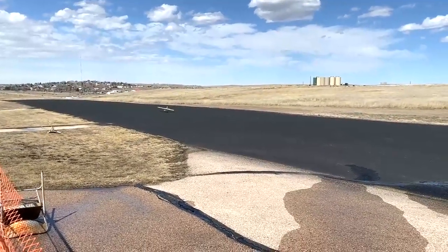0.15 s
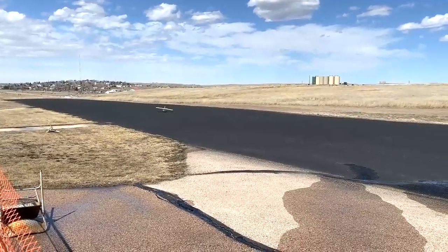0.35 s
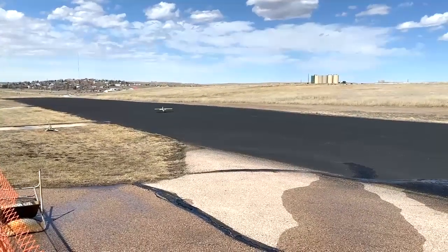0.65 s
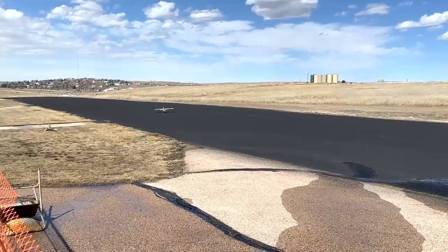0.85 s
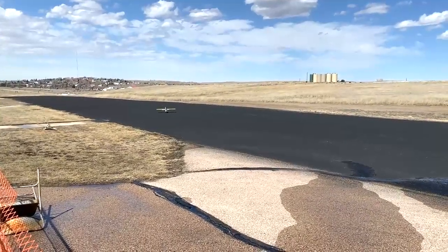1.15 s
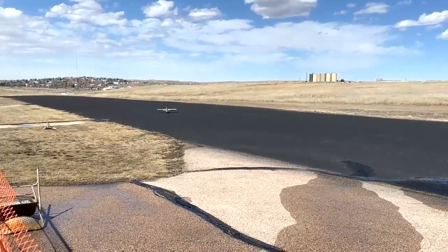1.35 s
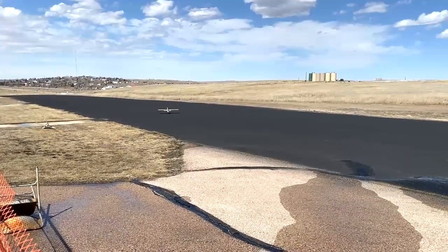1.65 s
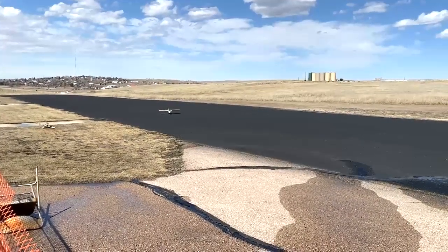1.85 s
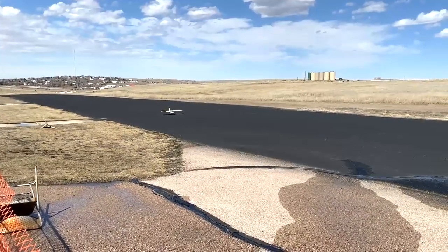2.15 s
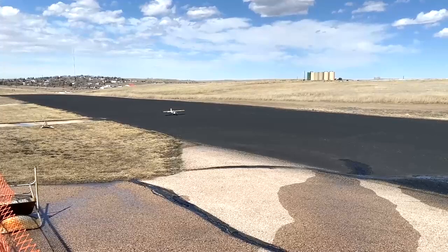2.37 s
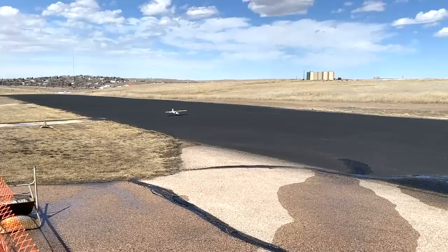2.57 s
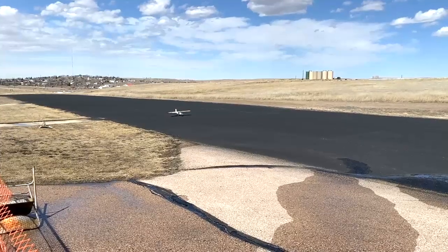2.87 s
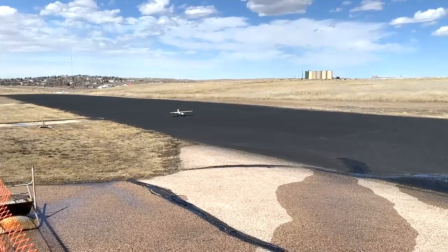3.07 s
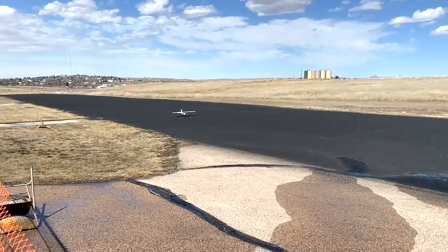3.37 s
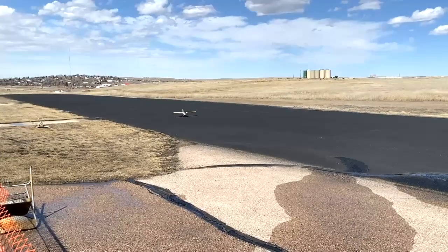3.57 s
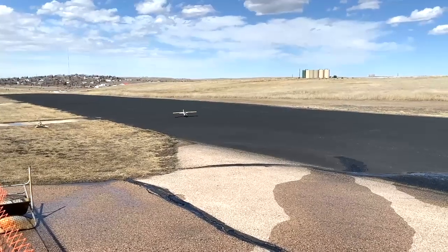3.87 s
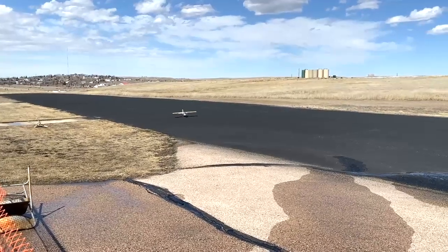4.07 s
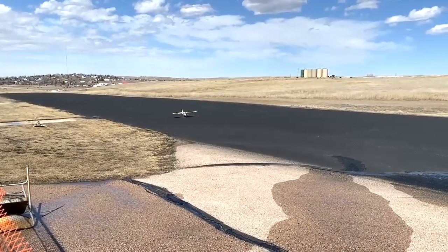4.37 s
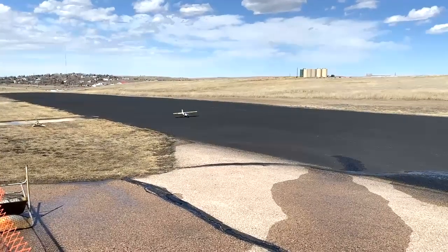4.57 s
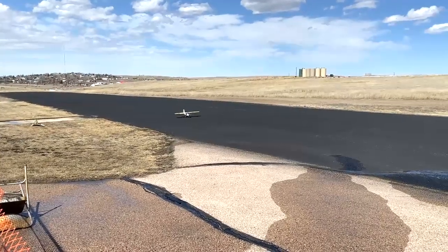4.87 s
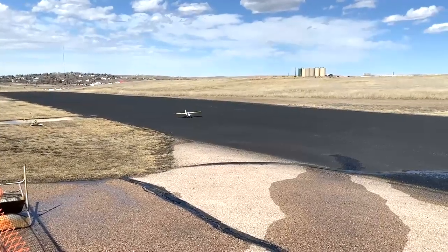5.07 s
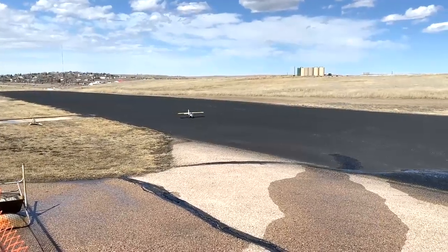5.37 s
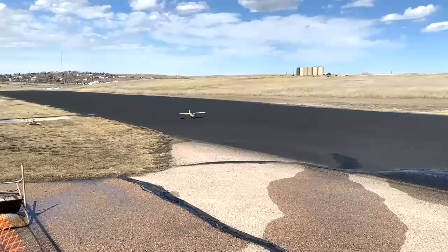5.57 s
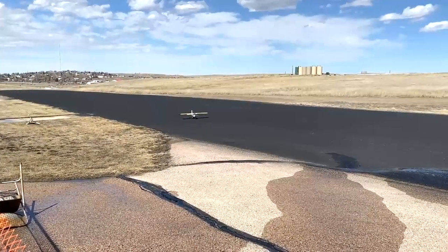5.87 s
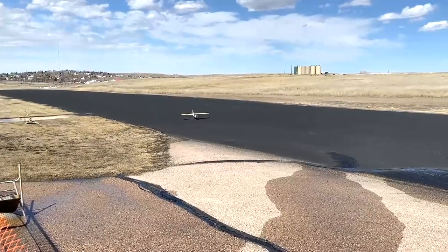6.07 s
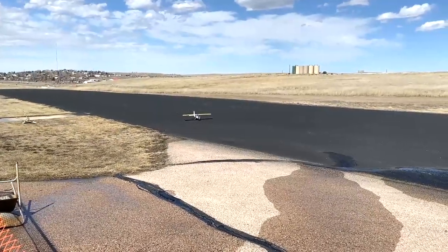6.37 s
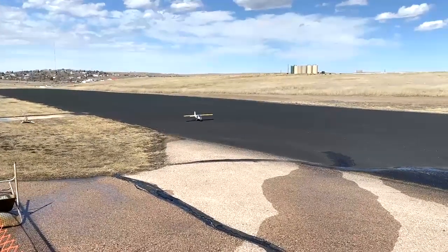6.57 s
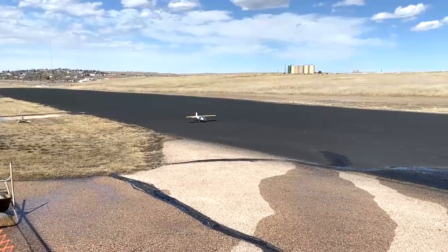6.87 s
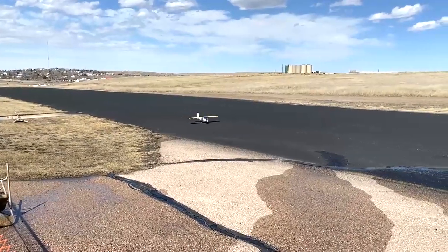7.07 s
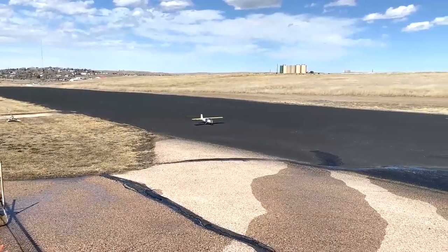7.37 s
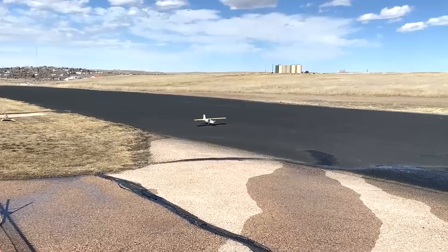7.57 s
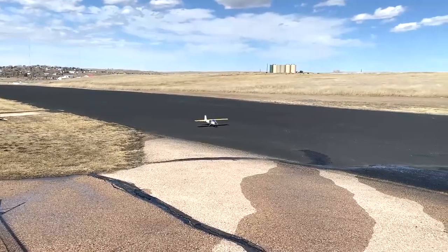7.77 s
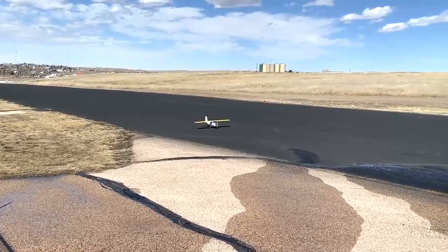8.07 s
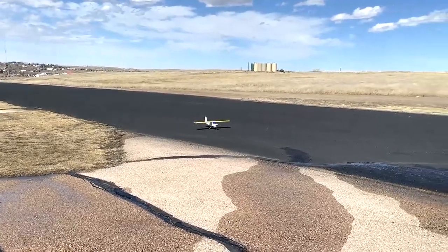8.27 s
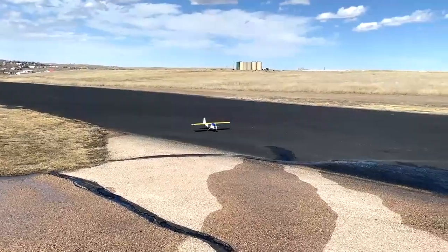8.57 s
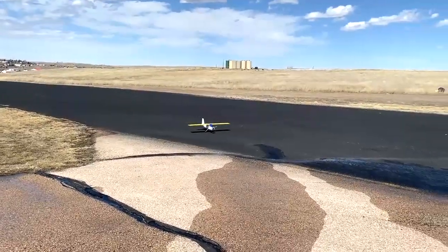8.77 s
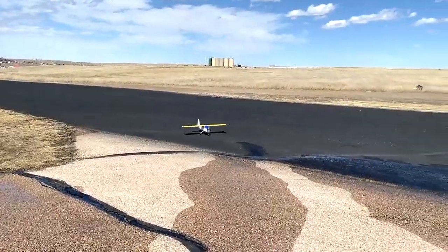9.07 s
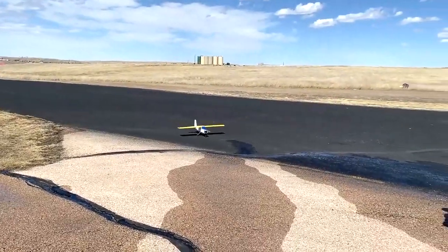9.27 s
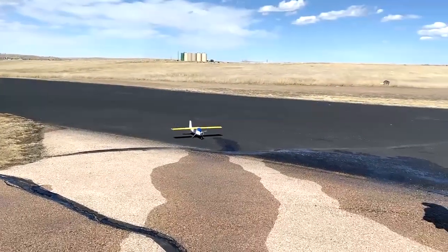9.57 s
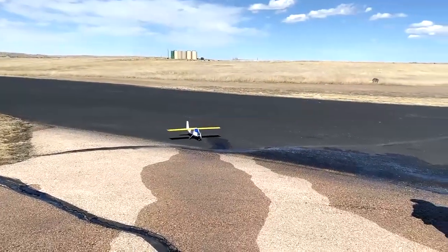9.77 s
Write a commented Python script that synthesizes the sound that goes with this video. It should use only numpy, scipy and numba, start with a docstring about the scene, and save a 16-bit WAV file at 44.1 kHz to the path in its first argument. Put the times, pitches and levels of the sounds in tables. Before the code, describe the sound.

A handheld stereo phone catches soft, bassy wind buffets, strongest a little past six seconds, over a distant model plane rolling on rough asphalt. Hollow wheel roar, light axle rattle, airy hiss and sparse grit clicks continue throughout. A faint electric whine dips, then sweeps up near four seconds and stays high beside a piercing, thin whistle. The plane comes nearer and louder; near the end the motor stops and the wheels roll on.

```python
"""Gusts thump and flutter on a phone while a small electric model plane taxis up an asphalt strip.
The wind is low noise plus eddies, short sines that slide down in pitch. Foam wheels roar as noise through
the resonances of a hollow airframe, with axle rattle, hiss and ticks of grit. The speed controller whistles
near 8 kHz and the motor whines up as the throttle opens: sines tied to the shaft speed. Two microphone
ports hear the strip with levels and phases that shift as the plane comes abeam."""
import sys
import numpy as np
from scipy import signal
from scipy.fft import rfft, irfft, next_fast_len
from scipy.io import wavfile
from scipy.ndimage import uniform_filter1d
from numba import njit

SR = 44100
rng = np.random.default_rng(int(sys.argv[2]) if len(sys.argv) > 2 else 0)


def master_out(mix):
    """Clip the mix to full scale and print it as 16-bit PCM to the path in sys.argv[1]."""
    frames = np.transpose(np.atleast_2d(mix))
    ceiling = np.clip(frames, -1, 1)
    pcm = np.round(ceiling * 32767).astype(np.int16)
    wavfile.write(sys.argv[1], SR, pcm)


N = 437913
T = np.arange(N) / SR
HZ = np.fft.rfftfreq(next_fast_len(N), 1 / SR)

# Wind between the puffs. Each row: time in seconds, rumble in dB, flutter in dB.
WIND_LULL = [(0, -31, -53), (0.15, -59, -59), (1.3, -61.5, -60), (1.77, -48.5, -51), (2.6, -56, -66.5),
             (5.2, -55.5, -56.5), (6.2, -55, -71.5), (6.44, -38, -43), (7.1, -35, -48.5), (7.3, -57, -57),
             (8.38, -58.5, -63), (8.63, -45.5, -56.5), (9.3, -63, -64), (9.93, -52, -72)]
# Puffs of wind on the ports. Each row: middle in seconds, length in seconds, rumble in dB, flutter in dB.
WIND_PUFFS = [(0.111, 0.057, -45, -47), (0.215, 0.016, -53, -41), (0.333, 0.04, -43.5, -49.5),
              (0.515, 0.04, -39.5, -46), (0.606, 0.03, -39.5, -42), (1.44, 0.061, -45.5, -50),
              (1.688, 0.03, -47, -40), (1.791, 0.034, -35.5, -44), (1.845, 0.081, -39, -51),
              (1.943, 0.046, -35.5, -42), (2.075, 0.02, -61, -62), (2.143, 0.0091, -35, -37.5),
              (2.27, 0.015, -27, -29.5), (2.361, 0.064, -36, -42), (2.491, 0.027, -40, -39.5),
              (2.631, 0.032, -39, -42.5), (2.694, 0.021, -49, -41.5), (2.844, 0.15, -52, -52),
              (3.002, 0.02, -40.5, -41.5), (3.124, 0.036, -51, -43.5), (3.284, 0.0225, -33.5, -42.5),
              (3.409, 0.084, -34, -40), (3.474, 0.051, -36, -53), (3.69, 0.042, -28.5, -34.5),
              (3.798, 0.17, -43.5, -46), (3.927, 0.042, -59, -53), (3.993, 0.067, -40, -51.5),
              (4.132, 0.058, -44, -48.5), (4.212, 0.047, -51, -43), (4.286, 0.065, -45, -46),
              (4.385, 0.034, -51, -39), (4.526, 0.032, -34.5, -39), (4.62, 0.048, -37, -36),
              (4.706, 0.015, -29.5, -32.5), (4.79, 0.18, -39.5, -50), (4.949, 0.011, -37.5, -43),
              (5.083, 0.025, -36, -40.5), (5.202, 0.16, -44.5, -56), (5.29, 0.05, -31, -30.5),
              (5.391, 0.12, -36.5, -41.5), (5.568, 0.06, -58, -57), (5.614, 0.23, -44, -60),
              (5.824, 0.0243, -37, -39), (5.901, 0.039, -40, -35.5), (5.954, 0.043, -41, -56),
              (6.046, 0.058, -37.5, -44.5), (6.295, 0.088, -27.5, -29), (6.404, 0.089, -32.5, -28),
              (6.443, 0.02, -31, -43), (6.495, 0.011, -34, -50), (6.595, 0.037, -42, -37),
              (6.824, 0.12, -51, -34.5), (6.916, 0.032, -29, -35), (7.106, 0.12, -44, -43),
              (7.18, 0.028, -39, -64), (7.255, 0.052, -34.5, -44), (7.5, 0.085, -37.5, -37.5),
              (7.62, 0.17, -41, -57), (7.796, 0.029, -42, -39.5), (7.854, 0.14, -49, -47),
              (7.979, 0.022, -53, -40.5), (8.057, 0.046, -57, -58), (8.16, 0.17, -70, -55),
              (8.356, 0.093, -64, -57), (8.453, 0.17, -45.5, -46), (8.629, 0.045, -38, -34.5),
              (8.809, 0.077, -37.5, -37.5), (9.025, 0.054, -38.5, -36.5), (9.147, 0.14, -38.5, -43),
              (9.33, 0.074, -65, -68), (9.5, 0.14, -52, -51.5), (9.7, 0.06, -51, -69),
              (9.747, 0.077, -59, -60), (9.831, 0.032, -50, -50)]
# Strong eddies. Each row: start in seconds, strength in dB before a trim, sharpness in dB (sets the pitch).
STRONG_EDDIES = [(0.216, -31, -17), (0.511, -29, -21), (0.737, -50, -7.5), (0.894, -44, -9.5),
                 (1.696, -34.5, -16.5), (1.777, -48, -11.5), (1.939, -38, -17.5), (2.135, -28.5, -20),
                 (2.259, -32, -9.5), (2.297, -29.5, -20), (2.368, -40, -15.5), (2.476, -27.5, -12.5),
                 (2.513, -34, -15.5), (3.112, -42, -14.5), (3.275, -31.5, -20.5), (3.36, -30, -19.5),
                 (3.385, -30.5, -15), (3.442, -43, -14), (3.638, -29, -16), (3.667, -28, -10.5),
                 (3.679, -21.5, -7.5), (3.69, -22.5, -13), (3.699, -30.5, -9.5), (3.73, -35, -9),
                 (3.762, -33.5, -14.5), (3.847, -42, -10.5), (4.196, -37, -12.5), (4.382, -38, -12.5),
                 (4.514, -29.5, -18.5), (4.611, -30.5, -13), (4.697, -24, -10), (4.798, -38, -16),
                 (4.946, -34.5, -14.5), (5.088, -35, -14.5), (5.277, -29, -8.5), (5.286, -44, -2.5),
                 (5.299, -37, -8), (5.345, -34.5, -15), (5.427, -32.5, -9), (5.547, -38, -12.5),
                 (5.582, -38, -10.5), (5.629, -32.5, -11), (5.827, -36.5, -16), (5.886, -36, -18.5),
                 (6.045, -39, -20), (6.257, -23.5, -9), (6.267, -21, -8), (6.295, -28, -5.5),
                 (6.326, -24.5, -11), (6.372, -22, -7), (6.409, -21, -9), (6.438, -33, -10.5),
                 (6.491, -45, -14.5), (6.561, -37, -12), (6.591, -29, -11.5), (6.658, -34, -11.5),
                 (6.782, -24, -9), (6.817, -18, -5.5), (6.915, -27, -9.5), (7.072, -57, -22),
                 (7.474, -29, -8), (7.785, -35, 1), (9.003, -35, -10), (9.316, -33.5, -5.5),
                 (9.557, -35, -2.5)]

# Rolling. Each row: time in seconds, wheel roar in dB, air and grit hiss in dB, axle rattle in dB.
ROLLING = [(0, -54, -64, -67), (0.07, -58.5, -77, -75), (0.12, -56, -68.5, -65.5), (0.18, -55.5, -71, -70),
           (0.215, -66, -76, -75), (0.25, -55, -67.5, -70), (0.47, -57, -69.5, -69), (0.6, -54.5, -65, -67),
           (0.8, -53, -66, -67), (1.38, -55, -64, -68), (1.74, -55, -66.5, -70), (2.16, -52.5, -62, -66),
           (2.6, -53.5, -65.5, -72), (3.3, -55.5, -68, -70.5), (3.58, -58.5, -70, -71.5),
           (3.95, -64.5, -69.5, -82), (4.26, -60.5, -63, -67), (4.81, -53.5, -63.5, -65),
           (5.58, -51.5, -64, -69), (5.78, -49.5, -60.5, -65), (6.47, -47.5, -61.5, -66),
           (6.91, -45.5, -60, -64), (7.71, -45, -59.5, -64), (8.4, -42, -55, -62), (9.3, -43, -57.5, -71),
           (9.93, -46, -59.5, -95)]
# Resonances of the hollow airframe. Each row: pitch in Hz, width in Hz, level in dB.
AIRFRAME_MODES = [(323, 190, -2.5), (683, 165, 2.5), (799, 143, 3), (1020, 226, -4), (1360, 350, -3.5),
                  (1690, 440, -5.5), (1955, 100, -9), (2210, 127, -10), (2570, 480, -14.5)]
# Resonances of the rattling axle. Each row: pitch in Hz, width in Hz, level in dB.
AXLE_MODES = [(2955, 310, -4.5), (3587, 390, -3.5)]
# Colour of the hiss. Each row: frequency in Hz, relative level in dB.
HISS_COLOUR = [(2200, 7), (2800, 8), (3700, 6.5), (4500, 6), (4900, 7), (5600, 5.5), (6400, 3), (7400, 4.5),
               (8200, 2), (8700, 5.5), (9300, -3), (10000, -42)]
# Colour of the top hiss. Each row: frequency in Hz, relative level in dB.
TOP_COLOUR = [(8800, -23), (9600, -10), (11500, -1.5), (12000, -13), (12400, 6), (13500, -4.5),
              (14700, -1.5), (16500, 1)]
# Grit flicked by the wheels. Each row: start in seconds, tick level in dB, lower part in dB before a trim.
GRIT_TICKS = [(0.703, -69, 21), (1.2436, -57, 1), (1.256, -57, -6), (1.3204, -62, -5), (1.3503, -57, 2),
              (1.4017, -52, -16), (1.4825, -54, -6), (1.5653, -54, -11), (1.6721, -60, -3),
              (1.8981, -60, -4), (1.9694, -63, -9), (1.9939, -56, 2), (2.1331, -66, 17), (2.2174, -55, -12),
              (2.5486, -58, -10), (2.8539, -60, -7), (5.7324, -73, -3), (7.1916, -55, -15),
              (7.7832, -61, -12), (7.8146, -49, -10), (7.9942, -70, -6), (8.0915, -76, -8),
              (8.3384, -59, -10), (8.8972, -59, -4), (9.2284, -61, -10), (9.2853, -50, 0), (9.397, -66, -8),
              (9.4345, -50, -2), (9.6155, -58, -14)]

# Controller whistle. Each row: time in seconds, level in dB.
WHISTLE_LEVEL = [(0, -79), (0.5, -72), (0.6, -79), (1.88, -77), (2.1, -65), (2.45, -68), (3.35, -64.5),
                 (3.6, -72), (3.95, -74), (4.06, -57), (4.34, -55.5), (5.62, -63.5), (5.75, -56),
                 (6.41, -61), (6.69, -54), (7.1, -58.5), (7.35, -55.5), (8.55, -49), (9.12, -54),
                 (9.33, -67), (9.42, -95)]
# Controller chopping rate as heard. Each row: time in seconds, rate in Hz.
CHOPPING_RATE = [(0, 8112), (.44, 8095), (.9, 8080), (1.44, 8062), (2.12, 8042), (2.9, 8026), (3.64, 8016),
                 (4.27, 8010), (4.74, 8015), (5.13, 8027), (5.7, 8033), (7.6, 8038), (8.6, 8044),
                 (9.4, 8052)]
# Blade passes that flutter the whistle. Each entry: multiple of shaft speed above the whistle.
BLADE_MULTIPLES = np.array([2, 4, 6, 8, 12, 14])
# The same blade tones. Each entry: level in dB re the whistle.
BLADE_LEVELS_DB = [-35, -17.5, -15.5, -63, -48, -43]
# Motor whine. Each row: time in seconds, level in dB applied to all its tones together.
WHINE_LEVEL = [(0, -80), (1.75, -87), (1.95, -66), (3.78, -74), (3.94, -67.5), (4.1, -66.5), (4.15, -61.5),
               (4.22, -70), (4.26, -56), (4.29, -64), (4.33, -55), (4.36, -66), (4.42, -51), (4.46, -59.5),
               (4.52, -55), (4.72, -56.5), (4.95, -60), (6.1, -60.5), (6.5, -58.5), (7.1, -60.5),
               (7.76, -60), (8.36, -54.5), (8.8, -63), (9.03, -53.5), (9.06, -64), (9.105, -60),
               (9.13, -82), (9.2, -95)]
# Motor speed. Each row: time in seconds, coil switching rate in Hz.
SWITCHING_RATE = [(0, 2160), (1.9, 2150), (3.62, 2020), (3.92, 2330), (4.03, 2600), (4.15, 3075),
                  (4.23, 3515), (4.28, 3712), (4.335, 3870), (4.38, 3965), (4.44, 4030), (4.53, 4165),
                  (4.6, 4218), (4.72, 4273), (4.92, 4315), (5.5, 4335), (6.44, 4330), (6.63, 4312),
                  (7.17, 4314), (7.3, 4283), (7.55, 4292), (8.0, 4278), (8.3, 4262), (8.55, 4278),
                  (9.03, 4262), (9.06, 4215), (9.115, 4062), (9.2, 3700)]
# Motor tones. Each entry: multiple of shaft speed.
ORDER_MULTIPLES = np.array([14, 21, 40, 42, 44, 46, 48, 49, 50, 63, 84])
# The same motor tones at steady speed, before the mount colours them. Each entry: level in dB.
ORDER_LEVELS_DB = [-10, -17, -15, 0, -20, -13, -10.5, -21, -14, -14, -14]
# How each motor tone answers a change of shaft speed. Each entry: share of the lift, negative to sink.
ORDER_SHARES = np.array([1, 1, -1, 0, -1, -1, -1, 1.5, -1, .8, 1])
# Side tones of the chopping. Each entry: multiple of shaft speed added to the chopping rate.
BESIDE_MULTIPLES = np.array([-63, -42, -21, 42])
# The same side tones at steady speed, before the mount colours them. Each entry: level in dB.
BESIDE_LEVELS_DB = [-18, -7, -14, -28]
# How each side tone answers a change of shaft speed. Each entry: share of the lift.
BESIDE_SHARES = np.array([1, .3, 1, 1])
# What the motor mount radiates. Each row: frequency in Hz, gain in dB.
MOUNT_GAIN = [(650, -12), (820, 4), (900, 0), (980, -14), (1250, -13), (1380, -5), (1450, -8), (1550, 8),
              (1700, 0), (1800, 2), (1950, -12), (2200, -16), (2850, -16), (3100, 1), (3750, -2), (4300, 0),
              (4400, -5), (4550, -16), (4850, -4), (5150, -11), (5500, -22), (5900, -10), (6250, -20),
              (6450, 2), (7300, -2), (7900, -22), (10500, -22), (11100, -3), (11600, -20)]

# How far the plane has come abeam. Each row: time in seconds, share from 0 to 1.
ABEAM_SHARE = [(0, 0), (3.5, 0.1), (4.5, 0.36), (7.5, 0.67), (8.2, 1), (9, 0.65), (9.4, 0.37), (9.93, 0.4)]
# Left port against right for the strip. Each row: frequency in Hz, left minus right in dB and lead of the
# right port in radians with the plane far, then the same two with it abeam.
PORT_BALANCE = [(400, 0, 0, 0, 0), (600, -1, -1.1, -1, -1), (1000, .7, -.45, 0, -.1),
                (1400, -4, -.55, -6, -.3), (1900, -6, -1.5, -9, -.55), (2100, -6, -1.4, -10, -1.4),
                (2400, 1, -3.1, -3, -2.4), (2700, 4, -3.9, -3, -3.1), (3000, 2, -4.9, 0, -3.2),
                (3450, 7, -6.3, 12, -5.7), (4300, 8, -6.3, 10, -6.6), (4650, 8, -5.7, 12, -5.1),
                (5300, 6, -6.7, 4, -5.8), (5700, 5, -9, 2, -7.9), (6050, 10, -11.3, 4, -12.5),
                (6400, 1, -12.5, 6, -11.8), (6800, .5, -12.5, 0, -12.5), (7400, .5, -12.5, .5, -12.5),
                (8000, 2.5, -11, 2, -11), (8700, 0, -9.5, 0, -9.5)]
# Further lead of the right port. Each row: frequency in Hz, half turns gained.
PORT_HALF_TURNS = [(8700, 0), (9500, 0), (10400, 1), (11700, 1), (12800, 2), (13800, 2), (15000, 3),
                   (17000, 3)]

# half a length from its middle a puff is this far down; its flanks bend by this power
PUFF_EDGE_DB, PUFF_BEND = 8, 1.49
# how much longer a puff takes to leave than to come (rumble, flutter)
PUFF_LINGER = (1.47, 0.92)
# snaps: level re flutter where flutter is -25.5 dB, and their extra growth in dB per dB of flutter
SNAP_DB, SNAP_SWING = -3.5, .4
# top hiss: level where the hiss stands at -61.5 dB, and its swing in dB per dB of hiss
TOP_DB, TOP_SWING = -67.5, 1.63
STEPS_PER_TURN = 42
# largest lift while the shaft changes speed, and the rate of change that gives three quarters of it
STRAIN_DB, STRAIN_HZ_PER_S = 12, 2400
STUTTER = .25  # whine stutter, dB per dB of lift
WIND_LAG_S, TOP_HZ = .00036, 15750


def undb(db):
    """Turn dB into a plain gain."""
    return 10 ** (np.asarray(db) / 20)


def unit(x):
    """Scale a sound to rms 1."""
    return x / np.sqrt(np.mean(x ** 2))


def curves(rows):
    """Columns of a timed table, drawn as one value a sample."""
    s, *columns = np.transpose(rows)
    return [np.interp(T, s, column) for column in columns]


def shade(points, hz):
    """Gain of (Hz, dB) points at the given frequencies."""
    f, db = np.transpose(points)
    return undb(np.interp(np.log(hz + 1), np.log(f), db))


def colour(x, gain):
    """Filter a sound by a gain over frequency."""
    size = next_fast_len(N)
    return irfft(rfft(x, size) * gain, size)[..., :N]


def walk(count, size=4000):
    """Smooth random wander, count new levels a second, without drift slower than size samples; rms 1."""
    hold = SR // count
    x = np.repeat(rng.standard_normal(N // hold + 1), hold)
    x = uniform_filter1d(uniform_filter1d(x, hold), hold)[:N]
    return unit(x - uniform_filter1d(x, size=size))


def ring(modes, bumps_db, own_db):
    """Each mode is shaken by its own noise and wander, all swelling on the same bumps; rms 1."""
    total = np.zeros(N)
    for f, width, db in modes:
        level = undb(db + bumps_db + own_db * walk(count=30))
        resonance = 1 / (1 + (2 * (HZ - f) / width) ** 2)
        total += level * np.sqrt(width) * unit(colour(rng.standard_normal(N), resonance))
    return unit(total)


@njit
def swirl(start, size, hz, turn, fall_s, end_hz, fade_s, swell=8.):
    """Eddies as sine grains: each swells quickly, then fades while its pitch slides down towards end_hz."""
    out = np.zeros(N)
    for k in range(len(start)):
        phase = turn[k]
        for i in range(min(int(5 * fade_s[k] * SR), N - start[k])):
            t = i / SR
            phase += 2 * np.pi * (end_hz + hz[k] / (1 + t / fall_s)) / SR
            envelope = (1 - np.exp(-swell * t / fade_s[k])) * np.exp(-t / fade_s[k])
            out[start[k] + i] += size[k] * np.sin(phase) * envelope
    return out


def puffs():
    """Rumble and flutter levels: puffs swell out of the lull; rumble sinks slower, flutter a little faster."""
    t = T[::100, None]
    middle, length, *peaks_db = np.transpose(WIND_PUFFS)
    levels = []
    for peak_db, lull_db, linger in zip(peaks_db, curves(WIND_LULL), PUFF_LINGER):
        away = 2 * np.abs(t - middle) / length / np.where(t > middle, linger, 1)
        power = np.sum(undb(peak_db - PUFF_EDGE_DB * away ** PUFF_BEND) ** 2, axis=1)
        levels.append(10 * np.log10(np.interp(T, t[:, 0], power) + undb(lull_db) ** 2))
    return levels


def small_eddies(flutter_db):
    """Flutter of many small eddies; a harder gust sheds smaller, faster ones."""
    when, size, pitch, turn = rng.random((1500, 4)).T
    start = (when * (N - 1)).astype(np.int64)
    hz = 400 * undb(0.2645 * (flutter_db[start] + 48.0) + 11 * (pitch - .5))
    gain = undb(-4 * np.log(size + 0.035))
    small = swirl(start, gain, hz, 2 * np.pi * turn, 0.00319, 72.5, 5.8 / hz)
    # even out the crowd so the flutter level alone shapes it
    power = uniform_filter1d(small ** 2, size=3000) + 0.014 * np.mean(small ** 2)
    return undb(flutter_db) * small / np.sqrt(power)


def snaps(flutter_db):
    """Brief snaps torn off by the wind, growing faster than the flutter so the hard gusts bring them out."""
    when, size, pitch, turn = rng.random((900, 4)).T
    start = (when * (N - 1)).astype(np.int64)
    hz = 900 * undb(9.0 * (pitch - 1.0))
    gain = undb(-4.5 * np.log(size + 0.01))
    grains = swirl(start, gain, hz, 2 * np.pi * turn, 0.002, 100., 1.6 / hz)
    return undb(SNAP_DB + flutter_db + SNAP_SWING * (flutter_db + 25.5)) * unit(grains)


def strong_eddies():
    """Thumps of single large eddies, each with an opening snap and a slower partner trailing it."""
    s, db, sharp_db = np.transpose(STRONG_EDDIES)
    hz = 2300 * undb(0.605 * sharp_db)
    turn, gap, next_turn = rng.random((len(s), 3)).T
    turn, next_turn = 2 * np.pi * turn, 2 * np.pi * next_turn
    start = (s * SR).astype(np.int64)
    thump = swirl(start, undb(db + 2.5), hz, turn, 0.002205, 69.4, 0.0019 + 6.4 / hz, 4.)
    # the snap is fainter on the dull ones
    snap_start = ((s + .001) * SR).astype(np.int64)
    snap_gain = undb(db + 5 + .9 * sharp_db)
    snap = swirl(snap_start, snap_gain, 1.35 * hz, next_turn, 0.002, 100., 1.6 / hz)
    late = ((s + 0.00517 + 0.00932 * gap) * SR).astype(np.int64)
    trail = swirl(late, undb(db - 11.0), 0.607 * hz, next_turn, 0.0052, 57.5, 0.012 + 5.9 / hz)
    return thump + snap + trail


def wind():
    """Low noise rumbles with the gusts while small and strong eddies slide down in pitch."""
    rumble_db, flutter_db = puffs()
    rumble_colour = [(20, -17), (45, 5.0), (65, 10.5), (110, 2.5), (200, -4.0), (400, -32.0)]
    rumble = unit(colour(rng.standard_normal(N), shade(rumble_colour, HZ)))
    return undb(rumble_db) * rumble + small_eddies(flutter_db) + snaps(flutter_db) + strong_eddies()


def wheels():
    """Rough asphalt shakes airframe and axles; hiss and sand ride above as coloured noise."""
    roar_db, hiss_db, axle_db = curves(ROLLING)
    # hiss comes and goes with the patches of the asphalt
    hiss_db = hiss_db + 0.7 * walk(count=4, size=40000)
    top_db = TOP_DB + TOP_SWING * (hiss_db + 61.5)
    bumps = walk(count=40)
    roar = ring(AIRFRAME_MODES, 1.2 * bumps + 1.0 * walk(count=90), 1.0)
    axle = ring(AXLE_MODES, 0.6 * bumps + 1.8 * walk(count=100), 1.5)
    hiss_flicker_db = .7 * bumps + 1.5 * walk(count=90)
    hiss_gain = shade(HISS_COLOUR, HZ) * (HZ > 2000)
    hiss = colour(undb(hiss_flicker_db) * rng.standard_normal(N), hiss_gain)
    # sparse large grains make the top end prickle
    sand = rng.standard_normal(N) * undb(2.9 * np.minimum(rng.exponential(size=N), 7.0))
    top_flicker_db = 0.85 * bumps + 1.6 * walk(count=35)
    top = colour(undb(top_flicker_db) * sand, shade(TOP_COLOUR, HZ))
    rolling = undb(roar_db) * roar + undb(axle_db) * axle
    return rolling + undb(hiss_db) * unit(hiss) + undb(top_db) * unit(top)


def grit():
    """Flicked grit ticks: filtered noise bursts with a bright top and a lower part that rings longer."""
    out, t = np.zeros(N), T[:1000]
    bright_band = signal.butter(2, [6500, 20600], "band", fs=SR, output="sos")
    lower_band = signal.butter(2, [3340, 3800], "band", fs=SR, output="sos")
    for s, db, lower_db in GRIT_TICKS:
        crack = rng.standard_normal(len(t))
        bright = unit(signal.sosfilt(bright_band, crack)) * np.exp(-t / 0.002)
        lower = unit(signal.sosfilt(lower_band, crack)) * np.exp(-t / 0.007)
        tick = undb(db) * (bright + undb(lower_db - 4) * lower)
        i = int(s * SR)
        out[i:i + len(t)] += tick[:N - i]
    return out


def tone(hz, flutter_db, waver_hz):
    """A sine whose level and pitch waver in the moving air; rms near 1."""
    phase = 2 * np.pi * np.cumsum(hz + waver_hz * walk(count=40)) / SR
    return np.sqrt(2) * np.sin(phase) * undb(flutter_db * walk(count=35))


def controller_whistle(chop_hz, shaft_hz):
    """The controller's chopping sings as a sine; blade passes add side tones and turbulence a noise skirt."""
    whistle = tone(chop_hz, 0.66, 5.8)
    for multiple, db in zip(BLADE_MULTIPLES, BLADE_LEVELS_DB):
        whistle += undb(db) * tone(chop_hz + multiple * shaft_hz, 2.1, 5.1)
    skirt = ring([(8030, 190, 0)], 0, 1.4)
    level_db = curves(WHISTLE_LEVEL)[0] + 0.49 * walk(count=8, size=20000)
    return undb(level_db) * (whistle + undb(-9.0) * skirt)


def motor_whine(steps_hz, chop_hz, shaft_hz):
    """Magnet and coil tones follow the shaft, with side tones of the chopping; the mount colours them all."""
    climb = uniform_filter1d(np.gradient(steps_hz) * SR, size=3000)
    strain_db = STRAIN_DB * np.tanh(np.abs(climb) / STRAIN_HZ_PER_S)
    pitches = [k * shaft_hz for k in ORDER_MULTIPLES]
    pitches += [chop_hz + k * shaft_hz for k in BESIDE_MULTIPLES]
    levels_db = [*ORDER_LEVELS_DB, *BESIDE_LEVELS_DB]
    shares = [*ORDER_SHARES, *BESIDE_SHARES]
    whine = np.zeros(N)
    for hz, db, share in zip(pitches, levels_db, shares):
        # tones that answer the strain also come and go
        drift_db = 1.6 * abs(share) * walk(count=12, size=20000)
        stutter_db = STUTTER * strain_db * walk(count=45)
        level = undb(db + share * strain_db + drift_db + stutter_db)
        voice = tone(hz, 1.2 + .3 * abs(share), 3.5 + .5 * abs(share))
        whine += level * shade(MOUNT_GAIN, hz) * voice
    return undb(curves(WHINE_LEVEL)[0]) * whine


def motor():
    """Shaft speed and chopping rate together drive the whine and the whistle."""
    steps_hz = curves(SWITCHING_RATE)[0]
    shaft_hz = steps_hz / STEPS_PER_TURN
    chop_hz = curves(CHOPPING_RATE)[0]
    return motor_whine(steps_hz, chop_hz, shaft_hz) + controller_whistle(chop_hz, shaft_hz)


def ports(x, balance_db, lead, sign):
    """What the two ports make of one sound: level and phase split evenly between left and right."""
    f = np.transpose(PORT_BALANCE)[0]
    half_turns = np.interp(HZ, *np.transpose(PORT_HALF_TURNS))
    lead = np.interp(HZ, f, lead) + np.pi * half_turns
    gain = undb(sign * np.interp(HZ, f, balance_db) / 2)
    return colour(x, gain * np.exp(-.5j * sign * lead))


def scene():
    """The plane crossfades from far to abeam at the two ports, under wind that sweeps across them."""
    sign = np.array([[1], [-1]])  # left, right
    strip = motor() + wheels() + grit()
    _, far_db, far_lead, abeam_db, abeam_lead = np.transpose(PORT_BALANCE)
    abeam = np.clip(curves(ABEAM_SHARE)[0], 0, 1)
    plane = (1 - abeam) * ports(strip, far_db, far_lead, sign)
    plane = plane + abeam * ports(strip, abeam_db, abeam_lead, sign)
    # a little scattered sound reaches the ports out of step
    scatter = rng.standard_normal(2000) * np.exp(-T[:2000] / 0.0082)
    scatter = scatter / np.linalg.norm(scatter)
    plane = plane + undb(-16) * sign * signal.fftconvolve(strip, scatter)[:N]
    air = colour(wind(), 1 / (1 + (HZ / 1750) ** 6))
    # eddies sweep past the right port first
    gusts = colour(air, np.exp(-1j * np.pi * sign * HZ * WIND_LAG_S))
    # a little of the buffeting differs from port to port
    apart = colour(air, np.exp(-2j * np.pi * 3.0 * np.log(HZ + 10)))
    return plane + gusts + undb(-12.5) * sign * apart


def record(dry):
    """The phone rounds the hardest buffets and cuts the deepest bass and the top."""
    dry = .3 * np.tanh(dry / .3)
    dry = signal.sosfilt(signal.butter(2, 30, "high", fs=SR, output="sos"), dry)
    return signal.sosfilt(signal.ellip(10, .2, 80, TOP_HZ, fs=SR, output="sos"), dry)


dry = scene()
out = record(dry)
master_out(out)
```